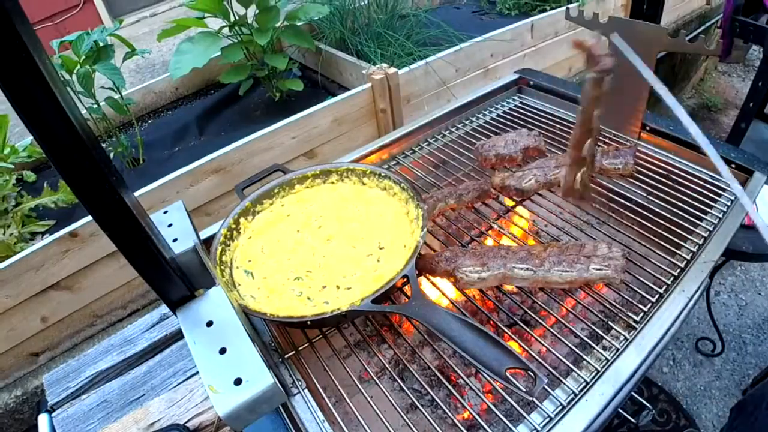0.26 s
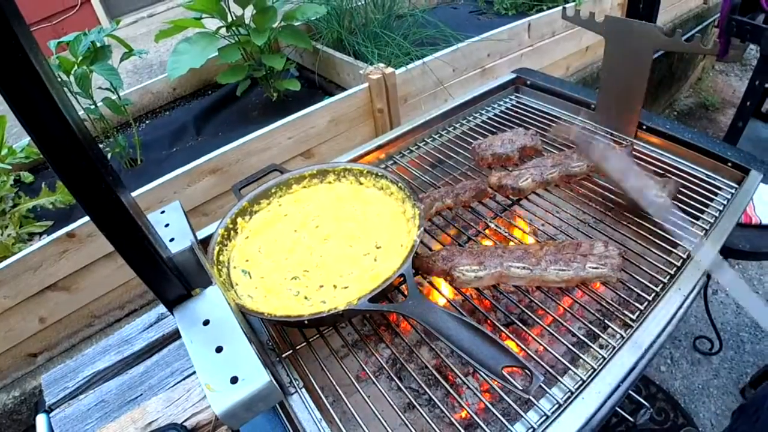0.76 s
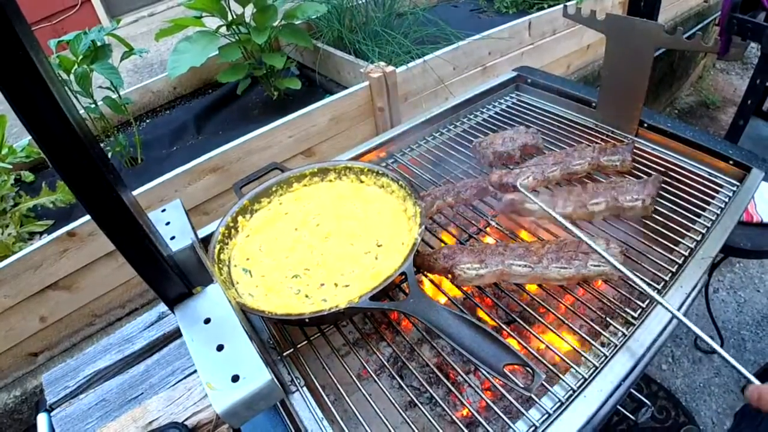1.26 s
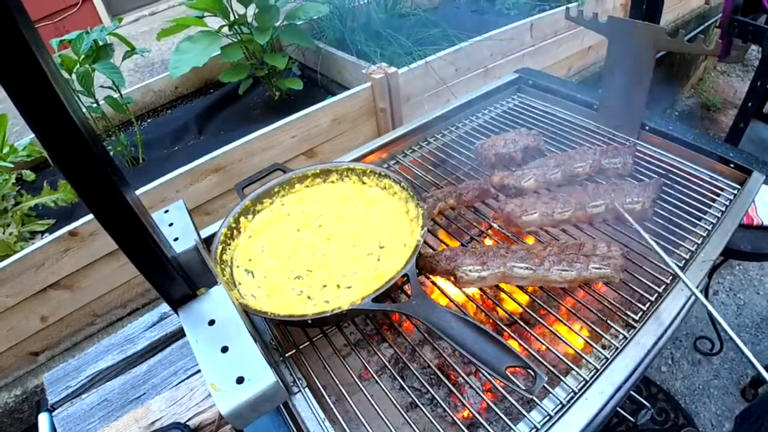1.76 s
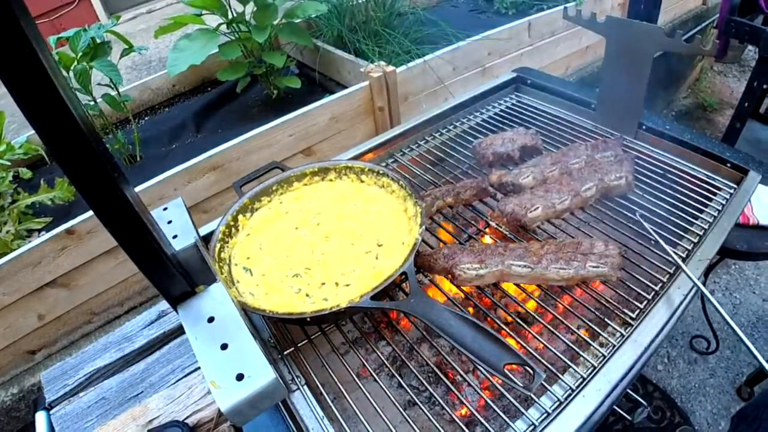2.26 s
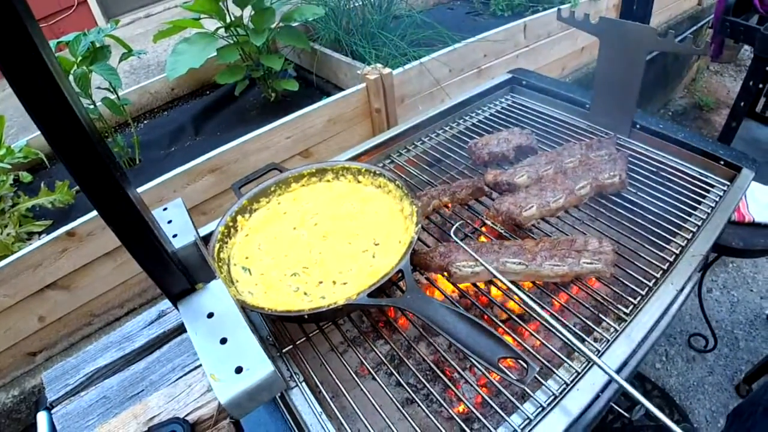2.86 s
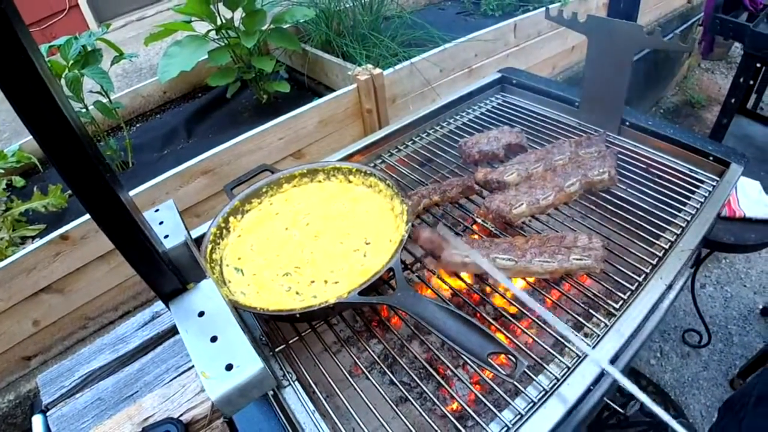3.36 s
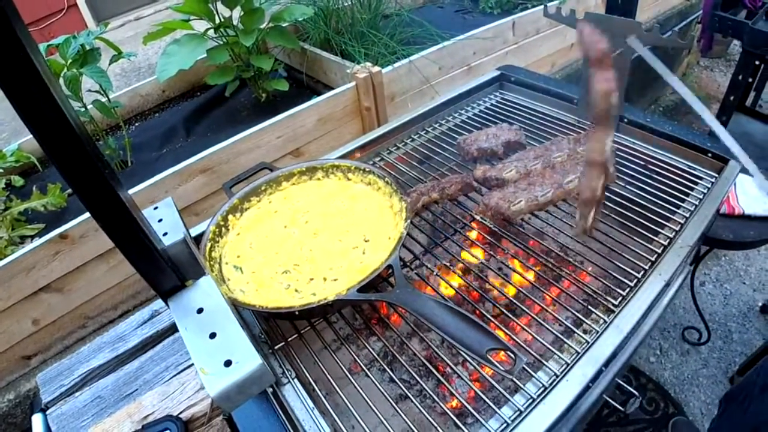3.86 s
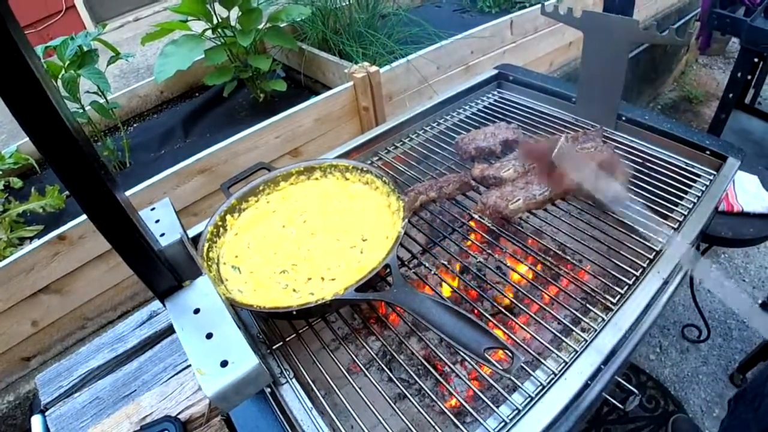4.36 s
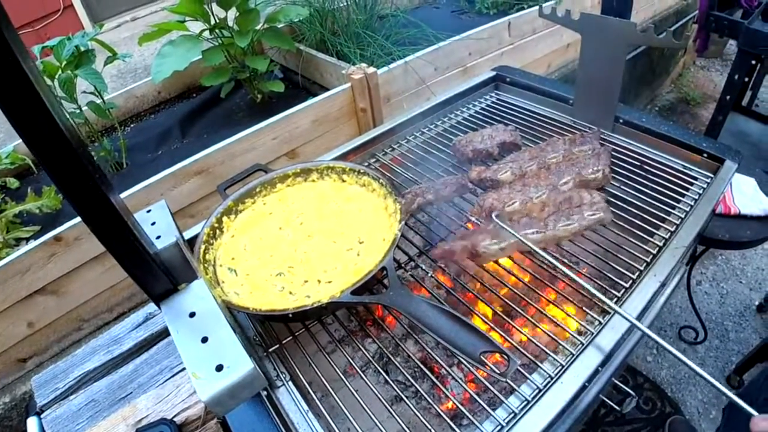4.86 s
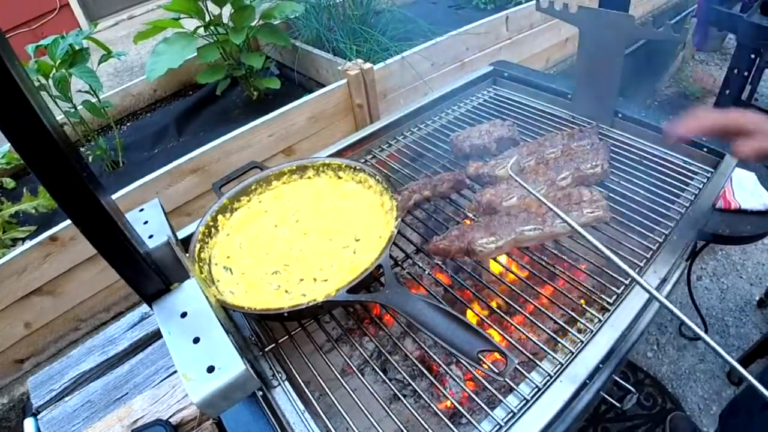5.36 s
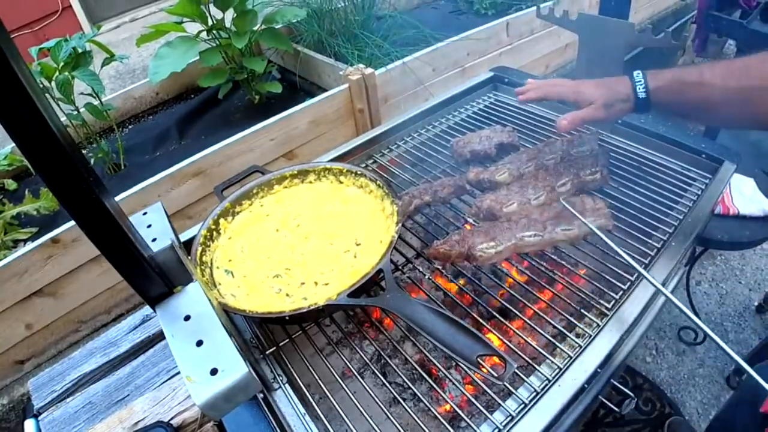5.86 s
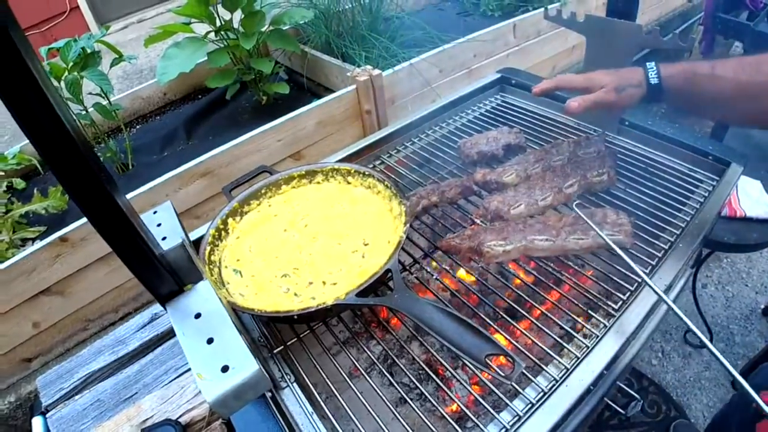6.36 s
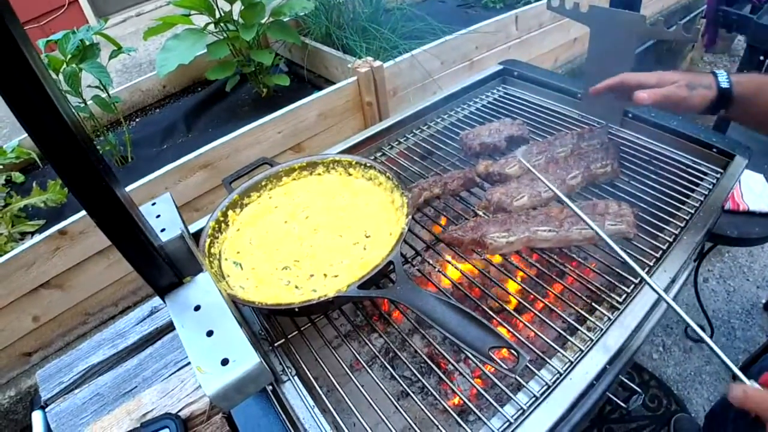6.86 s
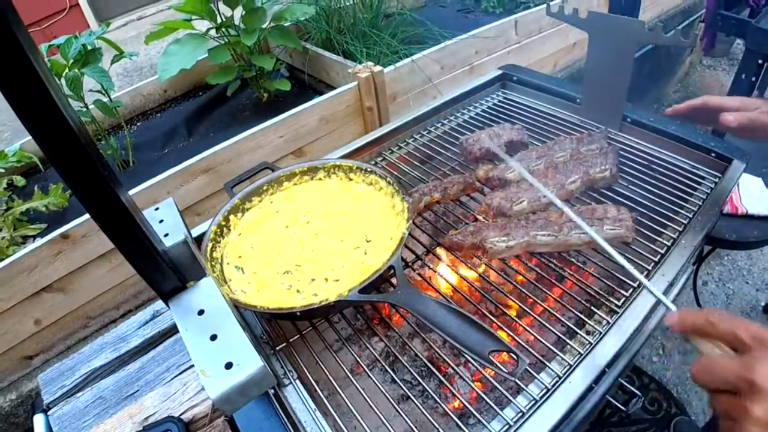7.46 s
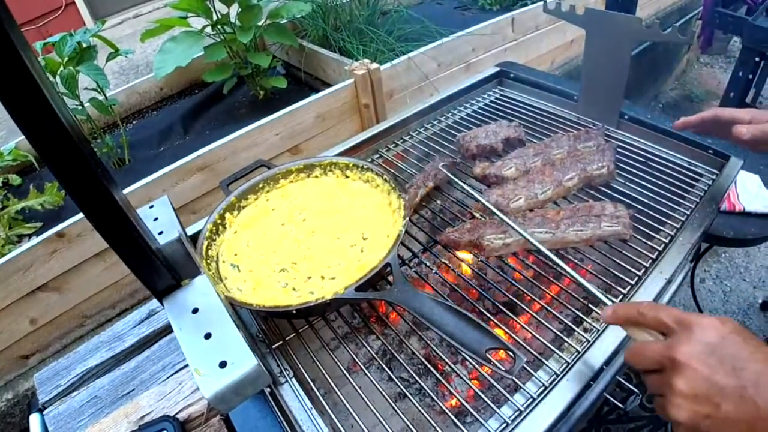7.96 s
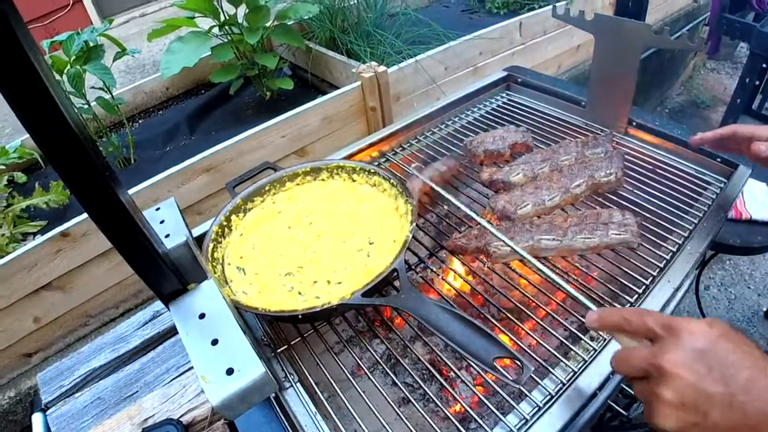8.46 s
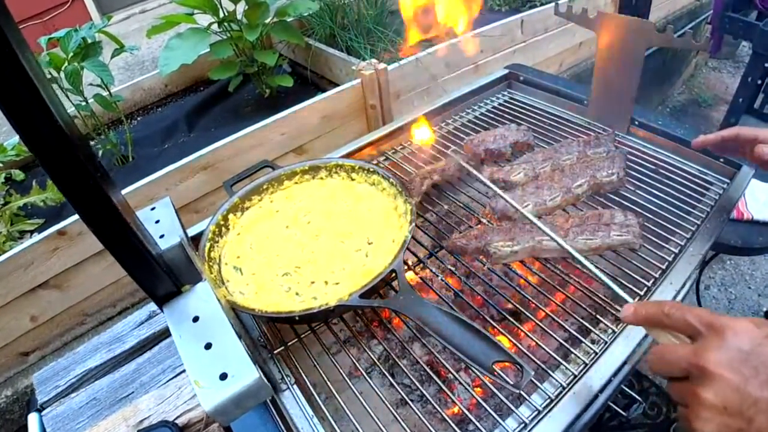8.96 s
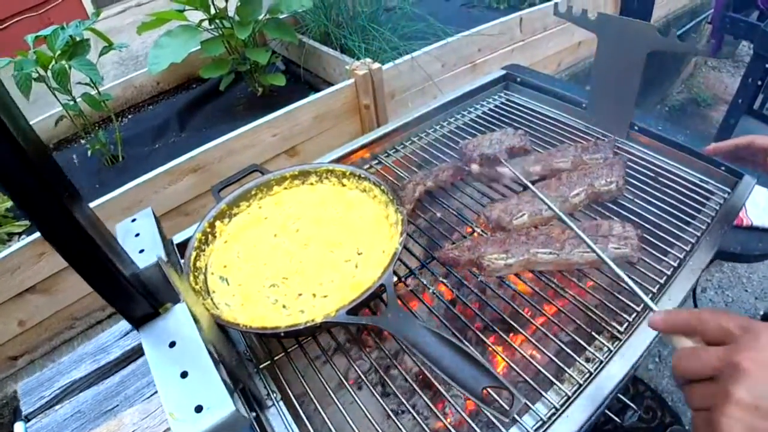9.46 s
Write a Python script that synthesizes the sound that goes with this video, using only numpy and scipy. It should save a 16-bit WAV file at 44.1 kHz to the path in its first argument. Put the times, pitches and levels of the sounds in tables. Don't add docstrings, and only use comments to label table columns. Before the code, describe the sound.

Close outdoor recording of meat on a coal grill. A crisp sizzle surges and fades over a soft low fire roar, with scattered coal cracks and bright spits. Around one second a strip is laid on the grate with a brief metallic ring and soft thud, and the fizz jumps up; another lands heavier at four and a half. Pops thicken later, and a bar hums briefly near eight.

```python
import sys
import numpy as np
from scipy import signal
from scipy.fft import rfft, irfft, next_fast_len
from scipy.io import wavfile

SR = 44100
rng = np.random.default_rng(int(sys.argv[2]) if len(sys.argv) > 2 else 0)


def int16_out(signal):
    q = np.round(np.clip(np.atleast_2d(signal).T, -1, 1) * 32767)
    wavfile.write(sys.argv[1], SR, q.astype(np.int16))


def gain_from_db(level_db):
    decades = np.asarray(level_db, float) / 20
    return 10 ** decades


N = 428211
SIZE = next_fast_len(N + 4096)
HZ = np.maximum(np.fft.rfftfreq(SIZE, 1 / SR), 1)
MEAN_FIZZ_DB = -51


def at_hz(points, column=1):
    points = np.array(points)
    return np.interp(np.log(HZ), np.log(points[:, 0]), points[:, column])


def shaped(x, response):
    return irfft(rfft(x, SIZE) * response, SIZE)[..., :N]


def band(x, low_hz, high_hz):
    sos = signal.butter(2, [low_hz, high_hz], "band", fs=SR, output="sos")
    return signal.sosfilt(sos, x + 1e-18)


def drift(rate_hz):
    r = np.exp(-20 * np.pi * rate_hz / SR)
    noise = rng.standard_normal(N // 10 + 8002)
    slow = signal.lfilter([1], [1, -2 * r, r * r], noise)[8000:]
    return np.interp(np.arange(N) / 10, np.arange(len(slow)), slow / slow.std())


def swells(rows):
    t = np.arange(0, N + 16, 16) / SR
    power = 0
    for top_s, top_db, rise_db_s, fall_db_s in rows:
        below_db = np.where(t < top_s, rise_db_s * (top_s - t), fall_db_s * (t - top_s))
        power = power + gain_from_db(2 * (top_db - below_db))
    return np.interp(np.arange(N) / SR, t, 10 * np.log10(power + 1e-20))


def grains(per_s, spread_db):
    loudness = gain_from_db(spread_db * np.minimum(rng.exponential(1, (2, N)), 4))
    sizes = loudness * rng.standard_normal((2, N))
    bursts = sizes * (rng.random((2, N)) < per_s / SR) + 0.5 * rng.standard_normal((2, N))
    return bursts / bursts.std()


# (top [s], fizz level [dB], rise [dB/s], fall [dB/s])
FLARES = [(.2, -53, 4, 22), (.95, -47, 88, 20), (1.05, -48.5, 60, 42), (1.24, -48, 26, 11.5),
          (2.3, -49, 11, 16), (3.43, -49, 17.5, 15.5), (4.2, -57.5, 8, 23), (4.62, -43.5, 130, 80),
          (4.87, -46, 29, 11.5), (6.1, -47, 31, 20), (6.9, -52.5, 10, 3.5), (7.87, -50, 45, 24),
          (8.55, -51.5, 33, 16), (8.82, -47.5, 22, 28), (9.48, -52, 63, 15), (9.63, -48.5, 35, 60)]


def heat():
    simmer_db = -60.5
    return 10 * np.log10(gain_from_db(2 * simmer_db) + gain_from_db(2 * swells(FLARES)))


# (frequency [Hz], level [dB per Hz])
FIZZ_TOP = [(3500, -24), (5000, -5.5), (6200, 3), (7900, 6.5), (9200, 2), (11000, 0.5), (13300, -2.5),
            (14000, -4), (15400, -4), (16200, -45)]
FIZZ_BODY = [(900, -28), (1900, -2.5), (3000, -0.5), (4100, 0), (5000, 2), (6500, -24)]


def fizz(top_db):
    body_db = -65.5 + 0.95 * (top_db - MEAN_FIZZ_DB)
    clumping_db = 1.0 * drift(11.0) + 1.0 * drift(58)
    bursts = grains(per_s=15000.0, spread_db=1.0) * gain_from_db(clumping_db)
    spark_db = 4.5 + 2.6 * np.minimum(rng.exponential(1, N), 3)
    sparks = (rng.random(N) < 40.0 / SR) * gain_from_db(spark_db)
    sputter = signal.lfilter([1], [1, -0.97], sparks)
    bursts += sputter * rng.standard_normal((2, N))
    top = gain_from_db(top_db + 10) * shaped(bursts, gain_from_db(at_hz(FIZZ_TOP)))
    body = gain_from_db(body_db + 23.5) * shaped(bursts, gain_from_db(at_hz(FIZZ_BODY)))
    return top + body


# (frequency [Hz], level [dB per Hz])
RUMBLE = [(20, 6), (40, 7), (90, 3.5), (170, 6.5), (260, 3.5), (380, -2.5), (550, 1.5), (800, -1.5),
          (1200, -3), (1600, -8), (3000, -10), (9000, -65)]


def fire(fizz_db):
    roar = shaped(rng.standard_normal((2, N)), gain_from_db(at_hz(RUMBLE)))
    level_db = -48.5 + 0.17 * (fizz_db - MEAN_FIZZ_DB)
    return gain_from_db(level_db + 12.5 + 1.0 * drift(4.3)) * roar


# (time [s], peak [dB], middle [dB re peak], low [dB re peak], tail [dB])
CRACKS = [(0.0551, -22, -20, -29, -14), (0.1769, -24, -21, -29, -20), (0.583, -21, -22.5, -39, -15.5),
          (1.2348, -22, -17, -22.5, -16.5), (1.8634, -17.5, -20, -28, -16), (2.097, -21.5, -22, -28, -15.5),
          (2.3222, -20.5, -19.5, -45, -14), (2.6081, -22, -24, -34, -11.5), (2.9903, -27, -12.5, -21, -10),
          (3.2416, -14.5, -19, -15, -16.5), (3.548, -19.5, -27, -35, -12.5), (4.4175, -28, -26, -45, -7.5),
          (5.3923, -19.5, -20.5, -30, -11.5), (5.7235, -21.5, -29, -45, -14),
          (6.234, -11.5, -24, -14.5, -11.5), (6.311, -24, -27.5, -27, -17), (6.6685, -20.5, -25, -34, -29),
          (7.0606, -19, -30, -40, -13), (7.1217, -15, -32, -36, -17), (7.4997, -7, -19.5, -38, -12),
          (7.6502, -14.5, -28, -32, -16.5), (7.9348, -21.5, -15.5, -28, -16),
          (8.2884, -18, -25.5, -29, -20), (8.3925, -27, -23, -29, -13)]
# (time [s], peak [dB], middle [dB re peak], left-right [dB])
SPITS = [(0.288, -22.5, -21.5, 1), (0.3469, -22.5, -33, 4), (1.5107, -17.5, -21.5, 3),
         (1.7909, -17.5, -35, 6), (1.8721, -23, -21, 0), (2.2253, -21, -30, -1), (2.424, -22.5, -19.5, 0),
         (3.3745, -25, -32, 2.5), (3.4036, -23, -25.5, -1), (3.8404, -10.5, -24, 1),
         (4.1884, -17.5, -31, 5), (4.4285, -21, -29, -1), (4.824, -21, -26, 1), (5.0004, -22.5, -24, 1),
         (5.0623, -22.5, -32, 2), (5.2622, -19, -28, 5), (5.5791, -13.5, -47, 10), (6.079, -24, -24, 2),
         (6.1626, -24, -26, 3), (6.2939, -23, -22.5, 7), (6.5822, -17.5, -26, 2), (6.8268, -21, -23, 3),
         (6.8432, -9.5, -48, 6), (6.8522, -19, -27, 0.5), (6.9265, -20, -30.5, 4), (7.5125, -16, -36.5, 4),
         (8.0185, -22, -31, 6), (8.323, -22, -18.5, -3), (8.6937, -22.5, -27, 3), (8.73, -15.5, -28, -4)]
# (time [s], peak [dB], middle [dB re peak])
TICKS = [(1.783, -28, -29), (2.7033, -29.5, -19), (2.8277, -27.5, -27), (3.4407, -25, -40),
         (3.645, -25, -27.5), (3.795, -28.5, -17), (4.5926, -26.5, -19), (4.6116, -27, -6),
         (5.4783, -25.5, -34), (5.5106, -27.5, -28), (5.5212, -29, -34), (5.778, -28, -25),
         (5.9097, -26, -26), (5.9391, -29, -19), (6.1154, -26.5, -21), (6.5596, -28, -34),
         (6.5888, -23, -25), (6.614, -25.5, -17), (6.8887, -29, -24), (6.9067, -28.5, -28),
         (7.0997, -28, -21), (7.1295, -26, -20), (7.183, -28, -28), (7.2237, -26.5, -17.5),
         (7.2716, -29, -15), (7.2845, -27.5, -25), (7.3128, -29, -14.5), (7.7278, -27.5, -33.5),
         (8.0753, -29, -14), (8.176, -29.5, -21)]
# (time [s], peak [dB])
FLECKS = [(.4186, -35.5), (.652, -36.5), (1.3625, -33), (1.4835, -30.5), (1.8179, -29), (2.1204, -30),
          (2.3084, -31.5), (2.3635, -32), (2.569, -35.5), (2.6881, -35.5), (3.3602, -32.5), (3.4709, -30.5),
          (3.6023, -31), (3.6289, -31), (3.753, -34.5), (3.9354, -35), (4.1576, -33.5), (4.5051, -30.5),
          (5.6963, -29.5), (5.7333, -31), (6.4085, -32.5), (6.4421, -30), (6.64, -30), (7.1662, -30.5),
          (7.2109, -31.5), (7.587, -30), (7.6722, -29.5), (7.8057, -30.5), (8.9436, -30.5), (9.1646, -32)]


def pop_rows():
    stray_count, stray_db, stray_middle_db = 20, -37, -19
    crack_pan_db, spit_low_db, spit_tail_db = 2, -52, -20.5
    tick_low_db, tick_pan_db, tick_tail_db = -44, 3, -17
    ticks = list(TICKS)
    ticks += [(s, peak, stray_middle_db - 3) for s, peak in FLECKS]
    for when, loud, colour in rng.random((stray_count, 3)):
        peak_db = stray_db + 7 * (loud - 0.5)
        ticks.append((when * (N / SR), peak_db, stray_middle_db + 14 * (colour - 0.5)))
    rows = [(s, peak, middle, low, crack_pan_db, tail) for s, peak, middle, low, tail in CRACKS]
    rows += [(s, peak, middle, spit_low_db, pan, spit_tail_db) for s, peak, middle, pan in SPITS]
    rows += [(s, peak, middle, tick_low_db, tick_pan_db, tick_tail_db) for s, peak, middle in ticks]
    return rows


def pops():
    s, peak_db, middle_db, low_db, pan_db, tail_db = np.transpose(pop_rows())
    t = np.arange(1400) / SR
    trains = np.zeros((3, 2, 2, N + len(t)))
    strengths = gain_from_db(np.array([peak_db + 15.0, peak_db + middle_db + 34.5, peak_db + low_db + 34.5]))
    flutter = gain_from_db(2.95 * rng.standard_normal((len(s), 1, len(t))))
    spray = rng.standard_normal((len(s), 2, len(t))) * flutter
    starts = np.round((s - 0.0001) * SR).astype(int)
    for k, at in enumerate(starts):
        burst = spray[k] * gain_from_db(tail_db[k] - 3.5) * gain_from_db(-60 * t / 0.027)
        burst[:, :3] = [1, 0.4, -0.3]
        lean_db = (pan_db[k] - 2.5) * np.array([0.5, -0.5])
        sides = gain_from_db(np.outer([1, 0.4, 0.2], lean_db))
        gains = strengths[:, k, None] * sides
        trains[..., at:at + len(t)] += gains[..., None, None] * burst
    bright, middle, low = trains[..., :N]
    upper = band(bright, 6730, 12500) - band(middle, 2860, 7500)
    return upper + band(low, 680, 1900) + gain_from_db(-8) * band(low, 160, 580)


# (frequency [Hz], width [Hz], level [dB])
BARS = [(502, 42, -11), (1140, 19, -29), (1550, 16, 2), (2910, 34, -4), (3430, 60, -3), (3820, 40, -3),
        (5540, 46, -6), (5730, 60, -8), (6860, 180, -3), (8700, 51, -5)]
# (top [s], level [dB], rise [dB/s], fall [dB/s])
SCRAPES = [
    (.88, -56, 150, 100),
    (.906, -37, 2500, 230),
    (4.482, -48, 350, 200),
    (4.508, -40, 900, 190),
    (4.612, -41, 2500, 190),
]
# (top [s], level [dB], rise [dB/s], fall [dB/s])
THUDS = [
    (.87, -48, 200, 60),
    (.95, -43, 200, 100),
    (1.02, -45, 100, 118),
    (4.54, -39, 300, 100),
    (4.572, -38.5, 200, 200),
    (4.62, -39.5, 300, 130),
]


def laying():
    scrape, thud = gain_from_db(swells(SCRAPES) + 16), gain_from_db(swells(THUDS) + 19.0)
    rub = grains(per_s=6800.0, spread_db=1.0)
    knocks = np.zeros(N)
    for s, db, *_ in SCRAPES:
        knocks[round(s * SR)] = gain_from_db(db + 41.5)
    rings = 0
    for hz, width_hz, level_db in BARS:
        rings = rings + gain_from_db(level_db + 9) / (1 + 2j * (HZ - hz) / width_hz)
    steel = band(scrape * rub, 790, 6900) + shaped(scrape * rub + knocks, rings)
    dull = band(band(rub, 116, 280), 93, 510) + gain_from_db(-13.5) * band(rub, 450, 980)
    return steel + thud * dull


# (time [s], jump [re full scale])
JOLTS_LEFT = [
    (6.8431, 0.72),
    (8.7300, 1.0),
]
JOLTS_RIGHT = [
    (1.7907, 0.2),
    (5.5791, 0.97),
    (6.8430, .32),
    (7.5131, 0.24),
    (8.7299, 0.667),
]


def jolts(rows):
    out = np.zeros(N)
    for s, jump in rows:
        t = np.arange(N - round(s * SR)) / SR
        out[-len(t):] += jump * (1.0 * np.exp(-t / 0.0158) - 0.041 * np.exp(-t / 0.41))
    return out


# (time [s], depth [dB])
PULLS = [
    (8.7320, -10.5),
    (5.5811, -12.5),
]


def limiter():
    t = np.arange(N) / SR
    gains = []
    for s, depth_db in PULLS:
        down = 1 / (1 + np.exp(-np.clip((t - s) / 0.00024, -50, 50)))
        back = 1 / (1 + np.exp(-np.clip((t - s - 0.04) / 0.006, -50, 50)))
        gains.append(1 - (1 - gain_from_db(depth_db)) * down * (1 - back))
    return np.array(gains)


# (top [s], level [dB], rise [dB/s], fall [dB/s])
HUMS = [
    (8.122, -36.5, 1400, 550),
    (8.16, -36, 350, 800),
]


def hum():
    hum_hz = 172
    cycles = hum_hz * np.cumsum(1 + 0.14 * drift(40)) / SR
    return gain_from_db(swells(HUMS)) * np.sin(2 * np.pi * cycles)


# (frequency [Hz], likeness [0-1], right lead [rad], left-right [dB])
PORTS = [(49.3, 1, -1.5, 0.5), (197, 1, 0, -1.1), (950, 0.97, 0, -1), (1610, 0.99, 0, -1.1),
         (5170, 1, 0.24, -1.5), (6270, 1, 1.06, 0), (8050, 0.5, 0.4, -0.5), (9270, 1, 1.02, 3.5),
         (11900, 0.47, 2.5, 3), (13140, 0.26, 4, 4.5), (15300, 0.7, 3, -2)]


def ports(direct, diffuse):
    alike = np.clip(at_hz(PORTS), 0, 1)
    lean = gain_from_db(at_hz(PORTS, column=3) / 2)
    lead = np.exp(1j * at_hz(PORTS, column=2))
    out = shaped(direct, np.array([lean, alike * lead / lean]))
    out[1] += shaped(diffuse, np.sqrt(1 - alike ** 2) / lean)
    return out


def scene():
    fizz_db = heat()
    direct, diffuse = fizz(fizz_db) + fire(fizz_db) + laying()
    spits = pops()
    air = ports(direct + spits[:, 0] + hum(), diffuse + spits[1, 1])
    return air + np.array([jolts(JOLTS_LEFT), jolts(JOLTS_RIGHT)])


def top_cut(x):
    return signal.sosfilt(signal.butter(12, 16640, fs=SR, output="sos"), x)


OFFSETS = [-0.013, -0.00445]


def record(dry):
    copy_step_s = 1 / 9600
    comb = sum(np.exp(-2j * np.pi * HZ * copy_step_s * (k - 1.5)) for k in range(4)) / 4
    limited = shaped(dry, comb) * limiter()
    mix = np.clip(limited + np.array(OFFSETS)[:, None], -1, 1)
    return top_cut(mix)


dry = scene()
out = record(dry)
int16_out(out)
```